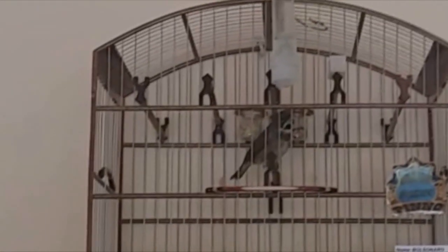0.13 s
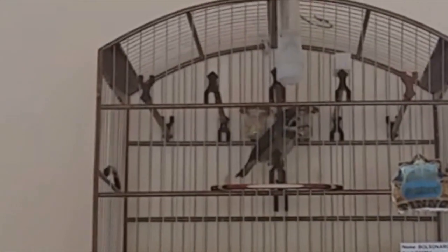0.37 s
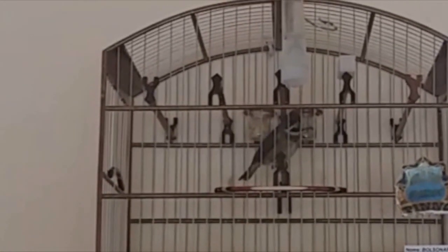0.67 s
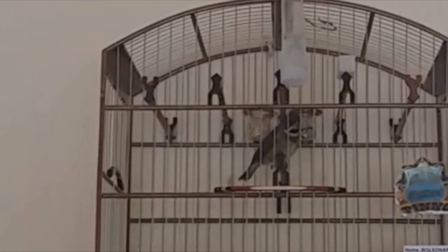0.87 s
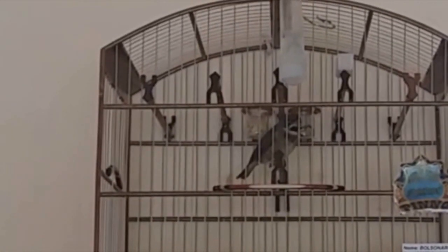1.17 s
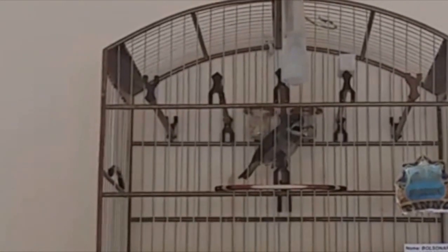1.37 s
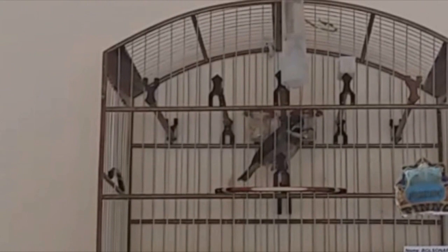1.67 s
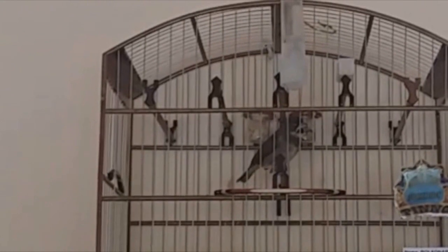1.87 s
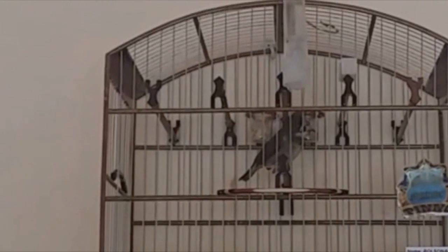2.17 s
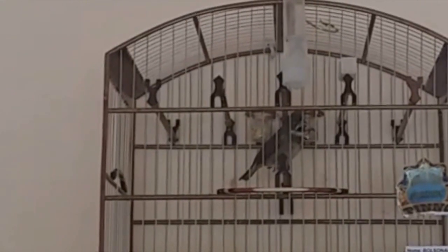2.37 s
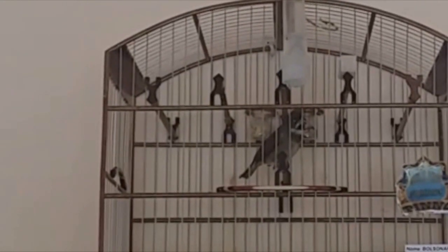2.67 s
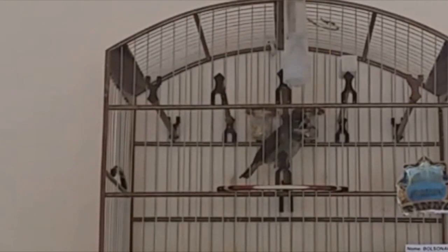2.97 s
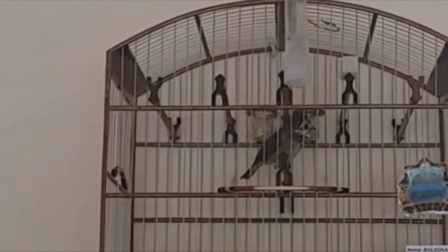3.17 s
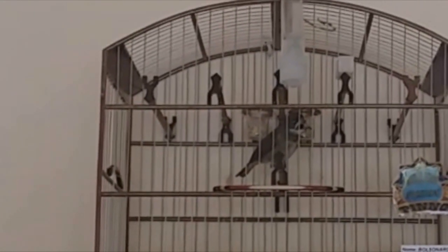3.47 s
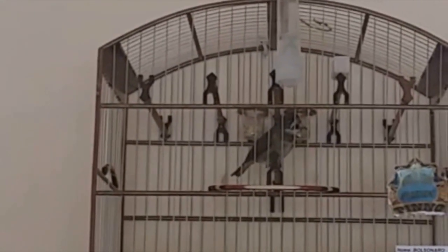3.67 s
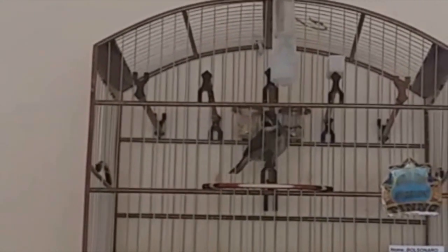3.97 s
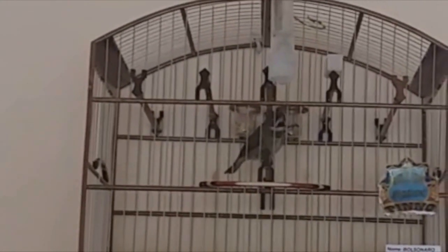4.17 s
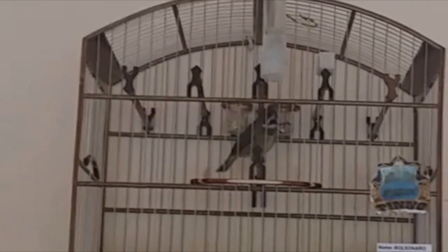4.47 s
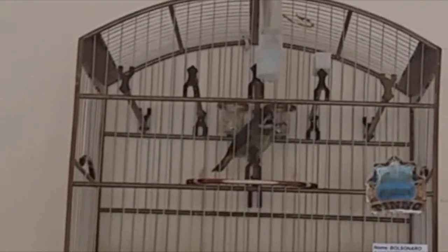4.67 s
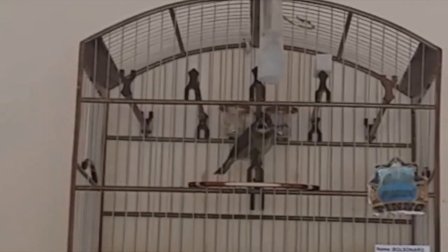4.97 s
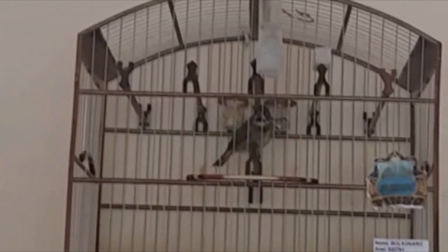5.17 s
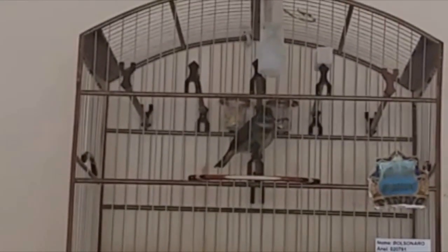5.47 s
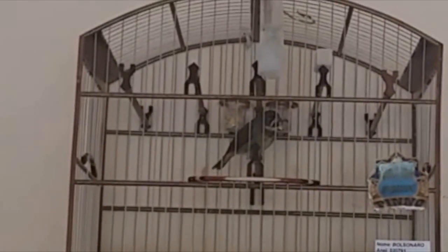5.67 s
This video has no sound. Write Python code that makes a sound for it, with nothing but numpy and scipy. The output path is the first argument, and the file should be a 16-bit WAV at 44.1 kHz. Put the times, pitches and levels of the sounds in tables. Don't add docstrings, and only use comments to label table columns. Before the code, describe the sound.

A small caged bird sings a fast, bright, tangled phrase in an echoing room, then clearer rising whistles answer over low traffic and engine rumble.

```python
import sys
import numpy as np
from scipy import signal
from scipy.fft import rfft, irfft
from scipy.io import wavfile
from scipy.ndimage import uniform_filter1d

SR = 44100
rng = np.random.default_rng(int(sys.argv[2]) if len(sys.argv) > 2 else 0)


def generate_wav(sig):
    pcm = np.round(np.clip(np.atleast_2d(sig).T, -1, 1) * 32767).astype(np.int16)
    wavfile.write(sys.argv[1], SR, pcm)


def invert_db(level):
    return 10 ** (np.asarray(level, dtype=float) / 20)


N = 257103

# [f/Hz, level/dB per Hz]
HISS_SPECTRUM = [(1000, -100), (3000, -104), (6000, -108), (10000, -112), (14500, -114), (16000, -120)]
# [t/s, firing rate f/Hz, then level/dB of its multiples 2, 4 and 5]
IDLING_ENGINE = [(0.0, 38.7, -32, -57, -49), (0.102, 41.8, -34.5, -46, -48),
                 (0.24, 42.25, -36, -41.5, -49.5), (0.414, 40.87, -33, -42, -45),
                 (0.676, 43.8, -39, -74.5, -49.5), (0.74, 41.5, -49, -52, -46)]
# [t/s, firing rate f/Hz, then level/dB of its multiples 1, 2 and 3]
PASSING_ENGINE = [(0.75, 66.2, -53, -60, -55), (0.93, 64, -51, -50.5, -48.5),
                  (1.08, 59.25, -50, -41.5, -62), (1.16, 59.9, -60, -55, -47), (1.31, 55.04, -50, -50, -58),
                  (1.61, 56.9, -42.5, -46.5, -67), (1.92, 56.97, -49.5, -43, -50.5),
                  (2.49, 57.7, -57, -33, -49), (2.59, 60.55, -46, -34, -45), (3.1, 63.45, -42, -32, -50),
                  (3.17, 63.1, -64, -37.5, -48), (3.35, 62.45, -45, -37.5, -56), (3.48, 67, -37, -59, -46),
                  (4.09, 71.5, -42, -41, -38), (4.15, 69.6, -34.5, -41, -62), (4.29, 70.7, -38, -39, -43.5),
                  (4.43, 74.3, -41, -42.5, -43.5), (4.61, 74.3, -36.5, -44, -43),
                  (4.71, 73.6, -39.5, -46, -46.5), (5.19, 56.36, -43, -48, -41.5),
                  (5.49, 56.7, -48.5, -46.5, -39.5), (5.62, 54.2, -39, -39, -51.5),
                  (5.77, 55.7, -41, -34.5, -42), (5.83, 58.2, -40, -59, -36)]
# [f/Hz, level/dB per Hz]
TRAFFIC_SPECTRUM = [(20, -37), (40, -19), (60, -20.5), (110, -2.5), (230, -9.5), (466, -21.5), (800, -24.5),
                    (1440, -28.5), (2000, -33), (3100, -38), (4500, -46.5), (7000, -67.5), (9000, -69),
                    (16000, -67)]
# [t/s, rumble level/dB, roar level/dB]
TRAFFIC_SWELL = [(0.0, -38, -51), (0.06, -58.5, -51.5), (0.28, -39.5, -54.5), (0.49, -46, -55.5),
                 (1.82, -46.5, -53), (2.21, -42, -49), (2.47, -54, -51), (2.53, -45, -55.5),
                 (3.83, -40.5, -50), (3.95, -40, -50.5), (4.04, -39.5, -50.5), (4.97, -38, -49.5),
                 (5.02, -35, -49.5), (5.67, -43.5, -50.5), (5.83, -34, -49.5)]
# [f/Hz, likeness 0 to 1]
PORT_LIKENESS = [(100, .995), (250, .96), (450, .86), (700, .6), (1200, .3), (1800, .1)]
# [f/Hz, lead/rad]
LEFT_LEAD = [(30, .15), (60, .31), (120, .55), (250, 1.0), (400, 1.5), (600, 1.9), (800, 2.5), (1200, 4.2)]
# [f/Hz, level/dB]
LEFT_LOUDER = [(60, 2.2), (120, 2.3), (250, 4), (400, 7.5), (700, 11), (1400, 17), (3000, 19), (8000, 20)]
# [f/Hz, level/dB]
BLOCKED_PORT = [(2000, -22), (3200, -25.5), (5000, -32.5), (7500, -54), (10000, -43)]
# [f/Hz, fade time/s]
ROOM_FADE = [(2000, 0.67), (3500, 0.48), (5500, 0.44), (8000, 0.28)]
# [delay t/s, level/dB]
FIRST_ECHOES = [(.0012, -0.5), (.0045, -2), (.0105, -2.5), (0.0153, 0.5), (0.024, -17), (0.031, -14.5),
                (0.039, -9)]
# [t/s, pitch f/Hz, level/dB]
SONG_GLIDES = [
    [(0, 4740, -34), (.014, 3440, -32)],
    [(.085, 3220, -43), (.11, 2655, -40.5)],
    [(.125, 3716, -28), (.15, 2966, -33.5)],
    [(.16, 1675, -42), (.18, 2800, -42), (.2, 3393, -25.5)],
    [(.309, 6200, -16), (.318, 5960, -28), (.332, 4800, -30), (.362, 3820, -33)],
    [(.35, 2490, -39.5), (.375, 3450, -32)],
    [(.38, 4450, -55), (.415, 3500, -33), (.44, 2530, -40)],
    [(.585, 4595, -44), (.595, 5130, -29), (.604, 6820, -20)],
    [(.6, 4500, -27.5), (.622, 6315, -19), (.64, 5130, -19.5)],
    [(.61, 7620, -29), (.625, 8640, -72)],
    [(.628, 4170, -41), (.65, 4320, -49)],
    [(.72, 7220, -27.5), (.745, 5900, -16)],
    [(.755, 6300, -38), (.785, 5385, -24.5), (.815, 5366, -33)],
    [(.725, 4450, -26.5), (.75, 3950, -41), (.78, 3405, -37.5)],
    [(.889, 6870, -30.5), (.903, 5870, -17), (.918, 7080, -37)],
    [(.918, 3380, -37), (.932, 3500, -57)],
    [(.985, 4000, -39), (.997, 4550, -51)],
    [(.998, 6290, -17), (1.012, 4800, -37)],
    [(1.012, 5700, -25), (1.035, 6000, -22.5), (1.056, 7450, -22)],
    [(1.13, 2536, -46), (1.145, 4000, -33), (1.168, 5260, -22)],
    [(1.174, 3050, -39), (1.19, 4320, -22.5), (1.2, 4800, -23.5)],
    [(1.2, 5290, -31.5), (1.245, 5540, -18), (1.263, 6570, -30)],
    [(1.33, 2135, -45), (1.35, 3700, -43), (1.372, 4540, -31)],
    [(1.375, 3260, -36.5), (1.405, 3890, -34)],
    [(1.405, 4820, -33), (1.428, 4790, -27)],
    [(1.43, 4060, -25), (1.455, 4830, -27), (1.485, 4920, -27.5)],
    [(1.555, 2570, -57), (1.58, 4240, -27.5)],
    [(1.592, 2980, -42), (1.605, 2500, -51)],
    [(1.618, 4280, -25.5), (1.66, 3520, -50.5)],
    [(1.668, 6440, -33), (1.69, 5590, -26.5)],
    [(1.68, 4360, -21.5), (1.705, 4840, -23), (1.737, 5480, -27)],
    [(1.805, 4100, -33), (1.838, 3050, -38)],
    [(1.84, 3800, -25.5), (1.865, 4800, -27.5), (1.9, 4310, -22.5)],
    [(1.91, 4570, -21.5), (1.925, 5175, -19), (1.955, 5080, -25)],
    [(1.926, 5620, -25), (1.934, 6850, -31)],
    [(2.005, 4600, -32), (2.03, 3040, -24.5)],
    [(2.032, 4400, -21.5), (2.06, 2970, -34)],
    [(2.062, 3750, -34), (2.095, 4496, -18.5), (2.135, 4736, -23.5)],
    [(2.18, 2870, -33.5), (2.205, 3400, -31), (2.232, 2373, -30.5)],
    [(2.236, 2900, -37), (2.265, 4130, -22.5), (2.312, 4943, -22.5)],
    [(2.32, 4700, -29), (2.35, 4450, -28)],
    [(2.362, 1882, -45), (2.39, 3115, -35.5), (2.42, 2917, -33)],
    [(2.37, 6800, -47), (2.44, 5800, -43)],
    [(2.438, 3856, -33), (2.456, 5050, -29)],
    [(2.458, 4560, -20.5), (2.485, 4897, -21.5), (2.505, 4780, -47)],
    [(2.6, 5890, -24.5), (2.64, 4775, -21)],
    [(2.638, 3500, -26), (2.65, 4500, -32.5), (2.667, 3970, -18.5)],
    [(2.668, 3185, -36), (2.69, 3286, -23), (2.72, 3234, -27), (2.755, 3222, -41)],
    [(2.824, 6050, -21), (2.835, 5450, -20.5), (2.85, 5190, -20)],
    [(2.848, 3500, -30), (2.866, 5040, -18)],
    [(2.87, 4200, -33), (2.9, 3584, -20.5), (2.927, 2816, -28)],
]
# [t/s, pitch f/Hz, level/dB]
BUZZED_GLIDES = [
    [(.276, 6980, -42), (.303, 6780, -36)],
    [(.292, 4480, -30), (.305, 4960, -32.5)],
    [(1.588, 7160, -46), (1.61, 6800, -45)],
    [(1.672, 7320, -44), (1.7, 7000, -45)],
    [(1.832, 7040, -42), (1.87, 6285, -43)],
    [(2.787, 7140, -42), (2.815, 6400, -35.5)],
    [(1.583, 5600, -36), (1.612, 4700, -19.5)],
    [(2.553, 7000, -21), (2.575, 6500, -30.5), (2.602, 5800, -5.5)],
]
# [t/s, level/dB before the lift in snaps()]
NOTE_SNAPS = [(0.2933, -56), (0.5995, -57.5), (0.737, -44), (1.047, -55), (1.2548, -45.5), (1.589, -48.5),
              (1.8372, -50.5), (1.919, -44.5), (2.1171, -45.5), (2.4558, -55.5), (2.572, -49),
              (2.8484, -52.5)]
# [t/s, pitch f/Hz, level/dB]
FAR_GLIDES = [
    [(0, 6940, -52), (.03, 5200, -48.5)],
    [(.13, 6900, -68), (.2, 4900, -46)],
    [(.05, 1500, -56), (.12, 1698, -62.5), (.19, 2107, -47.5)],
    [(.74, 2100, -46.5), (.755, 1850, -57)],
    [(3.12, 6200, -59), (3.15, 7600, -54.5)],
    [(3.22, 7100, -52), (3.27, 5910, -51.5), (3.3, 5480, -59)],
    [(3.37, 6000, -55), (3.43, 7300, -64)],
    [(3.49, 7130, -63), (3.53, 5470, -52)],
    [(3.62, 7380, -70), (3.67, 5680, -62)],
    [(3.63, 4130, -54), (3.68, 4340, -68)],
    [(3.73, 7500, -64), (3.77, 6200, -61.5)],
    [(3.9, 5770, -67.5), (3.96, 7600, -51.5)],
    [(4.05, 7820, -60.5), (4.11, 6030, -55.5)],
    [(4.76, 8450, -74), (4.82, 8950, -75.5)],
    [(4.82, 2310, -46.5), (4.89, 2525, -44.5), (4.95, 1970, -44.5), (5.01, 1970, -60.5)],
    [(5.23, 8300, -80), (5.3, 9200, -65)],
    [(5.365, 1883, -38), (5.39, 1730, -50)],
    [(4.87, 2290, -46), (4.93, 1914, -49)],
    [(4.93, 2610, -54), (5.0, 2310, -51), (5.06, 2000, -55)],
]
# [t/s, level/dB]
FLOCK_LEVEL = [(0, -64), (0.299, -66), (2.9, -53.5), (3.15, -63.5), (3.6, -66.5), (4.1, -66), (4.6, -76),
               (5.2, -70.5), (5.45, -87), (5.83, -80)]
# [t/s, pitch f/Hz, level/dB]
ANSWER_WHISTLES = [
    [(3.885, 3730, -52), (3.91, 3800, -46), (3.93, 4250, -46)],
    [(3.96, 3700, -47), (3.985, 4000, -54), (4.03, 3950, -61)],
    [(4.12, 2655, -39), (4.16, 3074, -29.5), (4.2, 3470, -32.5), (4.235, 3760, -39), (4.272, 3880, -40)],
    [(4.371, 2660, -43), (4.385, 2960, -34.5), (4.42, 3300, -33.5), (4.45, 3630, -30), (4.485, 3830, -40.5)],
    [(4.584, 2600, -40.5), (4.6, 3030, -32.5), (4.635, 3380, -28), (4.665, 3640, -32.5),
     (4.688, 3870, -38.5)],
    [(4.778, 2820, -39.5), (4.81, 3213, -31), (4.845, 3500, -34.5), (4.88, 3865, -43.5)],
    [(4.978, 2800, -30.5), (5.02, 3350, -40), (5.06, 3700, -33), (5.095, 4100, -55)],
    [(5.215, 4000, -42), (5.245, 3510, -38.5), (5.28, 3026, -35.5), (5.32, 2540, -40)],
]


def evened(x):
    return x / np.sqrt(np.mean(x ** 2) + 1e-20)


def read(points, hz):
    f, value = np.transpose(points)
    return np.interp(np.log(hz + 1), np.log(f + 1), value)


def drift(hz):
    z = rfft(rng.standard_normal(N))
    bin_hz = np.arange(len(z)) * SR / N
    return evened(irfft(z / (1 + (bin_hz / hz) ** 4), N))


def hiss():
    hz = np.fft.rfftfreq(N, 1 / SR)
    white = rfft(rng.standard_normal((2, N))) * np.sqrt(SR / 2)
    side_db = np.array([[1.5], [-1.5]])
    return irfft(white * invert_db(read(HISS_SPECTRUM, hz)) * invert_db(side_db), N)


def engine(rows, orders, waver=.008, flicker_db=1.2):
    s, hz, *levels = np.transpose(rows)
    t = np.arange(N) / SR
    on = np.clip(np.minimum(t - s[0] + 0.024, s[-1] + 0.046 - t) / 0.066, 0, 1)
    out = np.zeros(N)
    for order, db in zip(orders, levels):
        pitch = order * np.interp(t, s, hz) * (1 + waver * drift(5.1))
        turn = 2 * np.pi * np.cumsum(pitch) / SR
        level_db = np.interp(t, s, db) + flicker_db * drift(5.5)
        out += np.sqrt(2) * invert_db(level_db) * np.sin(turn)
    return on * out


def traffic_level(hz, frames, patches, patchy_db=2.0, roar_from_hz=232.0, steady_from_hz=2700.0):
    s, rumble_db, roar_db = np.transpose(TRAFFIC_SWELL)
    t = np.arange(frames) * 512 / SR
    roar = (hz ** 2 / (hz ** 2 + roar_from_hz ** 2))[:, None]
    moving = (1 / (1 + (hz / steady_from_hz) ** 2))[:, None]
    rumble_swell = (1 - roar) * np.interp(t, s, rumble_db + 37)
    roar_swell = roar * np.interp(t, s, roar_db + 58)
    change_db = moving * (rumble_swell + roar_swell + patchy_db * patches)
    return invert_db(read(TRAFFIC_SPECTRUM, hz)[:, None] + change_db - 39.5)


def street():
    frames, hz = N // 512 + 5, np.fft.rfftfreq(2048, 1 / SR)
    a, b, c, d, patches = rng.standard_normal((frames, 1025, 5)).T
    patches = uniform_filter1d(patches, size=5, axis=0)
    patches = evened(uniform_filter1d(patches, size=14, axis=1))
    level = traffic_level(hz, frames, patches)
    engines = engine(IDLING_ENGINE, orders=(2, 4, 5)) + engine(PASSING_ENGINE, orders=(1, 2, 3))
    padded = np.pad(engines, (0, (frames - 1) * 512 - N))
    engine_frames = signal.stft(padded, nperseg=2048, noverlap=1536, padded=False)[2]
    left = level * (a + 1j * b) + engine_frames
    same = np.clip(read(PORT_LIKENESS, hz), 0, 1)[:, None]
    late = np.exp(-1j * read(LEFT_LEAD, hz))[:, None]
    own_noise = level * (c + 1j * d)
    right = same * late * left + np.sqrt(1 - same ** 2) * own_noise
    right = right * invert_db(-read(LEFT_LOUDER, hz))[:, None]
    return signal.istft(np.array([left, right]), nperseg=2048, noverlap=1536)[1][:, :N]


def whistles(tables, second_db, third_db, flutter_hz=0., rasp_db=-40., air_db=-60.0, edge_s=0.0057):
    out, shake = np.zeros(N), drift(260.)
    rasp = 1 + invert_db(rasp_db) * drift(1800.)
    rasp = rasp + invert_db(air_db) * rng.standard_normal(N)
    for rows in tables:
        s, hz, db = np.transpose(rows)
        at = np.arange(max(round(s[0] * SR), 0), round(s[-1] * SR))
        t = at / SR
        pitch = uniform_filter1d(np.interp(t, s, hz), size=150, mode="nearest")
        pitch = pitch + flutter_hz * shake[at]
        turn = 2 * np.pi * np.cumsum(pitch) / SR
        tone = np.sin(turn) + invert_db(second_db) * np.sin(2 * turn) + invert_db(third_db) * np.sin(3 * turn)
        from_end = np.minimum(t - s[0], s[-1] - t)
        edge = np.sin(np.pi / 2 * np.clip(from_end / edge_s, 0, 1)) ** 2
        out[at] += np.sqrt(2) * invert_db(np.interp(t, s, db)) * edge * tone * rasp[at]
    return out


def room(x, direct_db, wet_db, gap_s, build_s):
    t = np.arange(SR) / SR
    taps = rng.standard_normal((2, SR)) * (rng.random((2, SR)) < .15)
    hz, frame_s, z = signal.stft(taps, SR, nperseg=256)
    fade = invert_db(-60 * frame_s / read(ROOM_FADE, hz)[:, None])
    tail = signal.istft(z * fade, SR, nperseg=256)[1][:, :SR]
    tail = tail * np.clip((t - gap_s) / build_s, 0, 1)
    tail = tail / np.linalg.norm(tail, axis=1, keepdims=True)
    return invert_db(direct_db) * x + invert_db(wet_db) * signal.fftconvolve(x[None], tail, axes=1)[:, :N]


def wall_echoes(x, echo_db):
    out = np.zeros((2, N))
    for delay_s, db in FIRST_ECHOES:
        for port, skew in zip(out, rng.uniform(.9, 1.1, 2)):
            lag = round(delay_s * skew * SR)
            port[lag:] += invert_db(db + echo_db) * x[:N - lag]
    return out


def caged_singer():
    song = whistles(SONG_GLIDES, second_db=-44.5, third_db=-43.0, flutter_hz=60.,
                    rasp_db=-21.0, air_db=-40.0, edge_s=0.001)
    song += whistles(BUZZED_GLIDES, second_db=-39.5, third_db=-46.5, flutter_hz=386.0,
                     rasp_db=-33.0, air_db=-37.5)
    throb_db = 3. * drift(110.7)
    song = song * invert_db(throb_db) + snaps()
    return room(song, direct_db=-6., wet_db=2.0, gap_s=.002, build_s=0.0066) + wall_echoes(song, echo_db=-6.0)


def flock_glides(low_hz=4800., high_hz=7300., glide_hz=900., glide_s=0.027):
    s, db = np.transpose(FLOCK_LEVEL)
    when, height, slope, size = rng.random((500, 4)).T
    start = when * (N / SR - .05)
    pitch = low_hz + height * (high_hz - low_hz)
    change = glide_hz * (2 * slope - 1)
    level = np.interp(start, s, db) + 6 * size
    return [[(a, f, v), (a + glide_s, f + g, v)] for a, f, g, v in zip(start, pitch, change, level)]


def far_birds():
    far = whistles(FAR_GLIDES, second_db=-48.5, third_db=-66., flutter_hz=60., rasp_db=-22.)
    far += whistles(flock_glides(), second_db=-54.0, third_db=-64.5, flutter_hz=250., rasp_db=-7.0)
    return room(far, direct_db=-20., wet_db=3.2, gap_s=.003, build_s=0.0067)


def snaps(low_hz=3500., ring_s=0.0011, lift_db=12.0):
    out, t = np.zeros(N), np.arange(400) / SR
    bursts = rng.standard_normal((len(NOTE_SNAPS), 400))
    for (s, db), burst in zip(NOTE_SNAPS, bursts):
        out[round(s * SR):][:400] += invert_db(db + lift_db) * burst * np.exp(-t / ring_s)
    return signal.sosfilt(signal.butter(2, low_hz, "highpass", fs=SR, output="sos"), out)


def nearer_bird():
    near = whistles(ANSWER_WHISTLES, second_db=-33.5, third_db=-47.0, rasp_db=-30., air_db=-41.0, edge_s=0.0021)
    return room(near, direct_db=0.5, wet_db=-8.0, gap_s=.018, build_s=0.004) + wall_echoes(near, echo_db=-11.)


def birds():
    left, right = caged_singer() + far_birds() + nearer_bird()
    blocked = invert_db(read(BLOCKED_PORT, np.fft.rfftfreq(N, 1 / SR)))
    return np.array([left, irfft(rfft(right) * blocked, N)])


def scene():
    return hiss() + street() + birds()


def band_limit(x):
    return signal.sosfilt(signal.butter(12, 15600, fs=SR, output="sos"), x)


def record(dry, square_db=-22., cube_db=-21.5):
    sums = signal.sosfilt(signal.butter(2, 6000., "highpass", fs=SR, output="sos"), dry ** 2)
    bent = dry + invert_db(square_db) * sums - invert_db(cube_db) * dry ** 3
    return band_limit(bent)


dry = scene()
out = record(dry)
generate_wav(out)
```